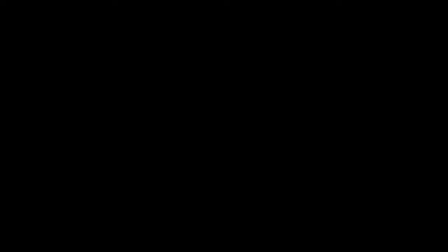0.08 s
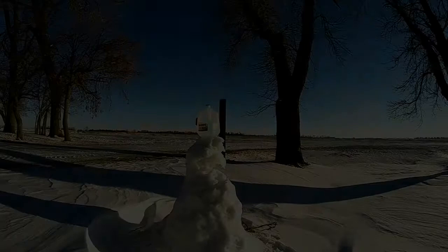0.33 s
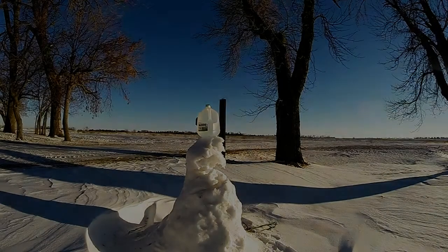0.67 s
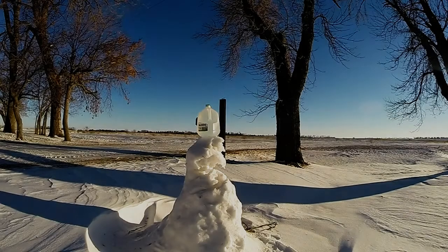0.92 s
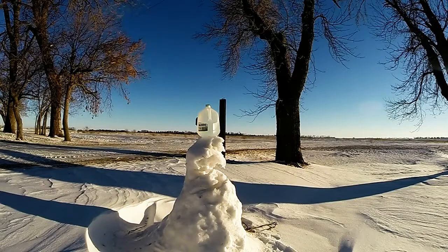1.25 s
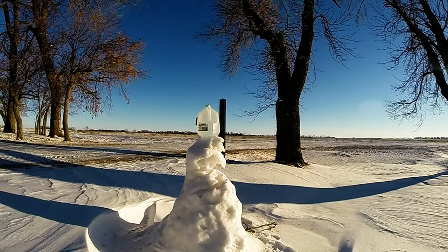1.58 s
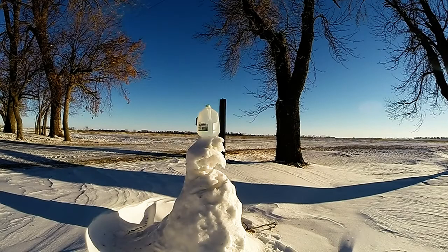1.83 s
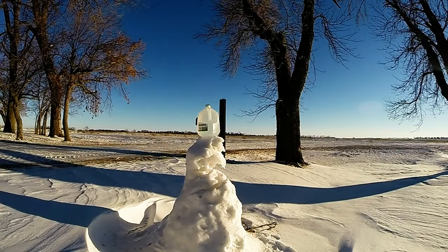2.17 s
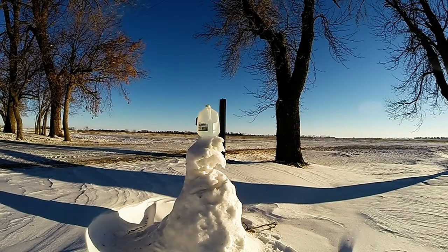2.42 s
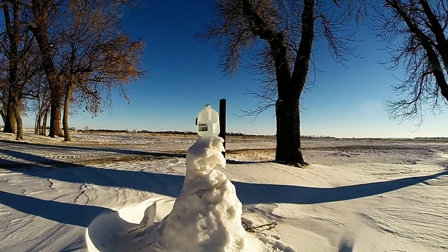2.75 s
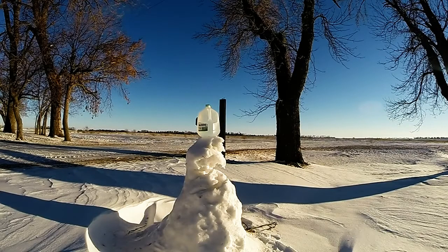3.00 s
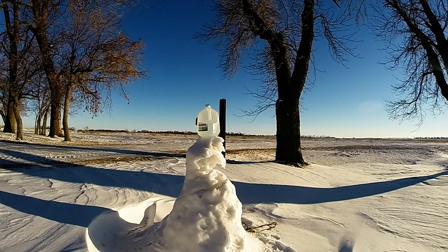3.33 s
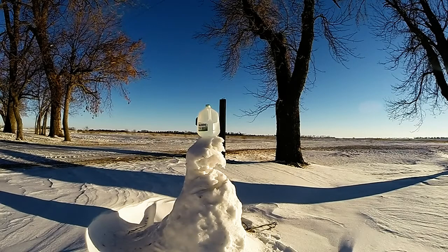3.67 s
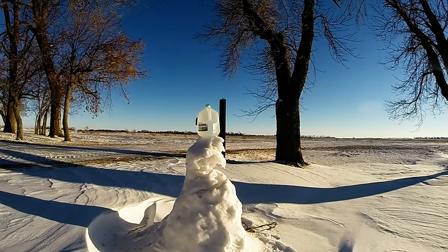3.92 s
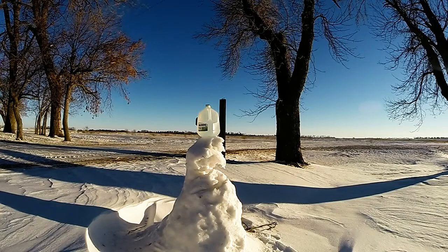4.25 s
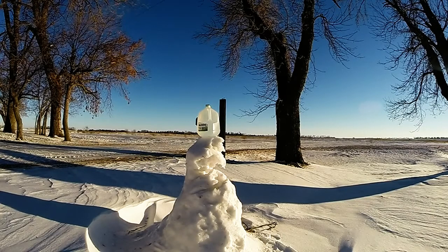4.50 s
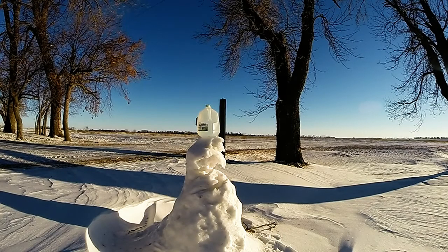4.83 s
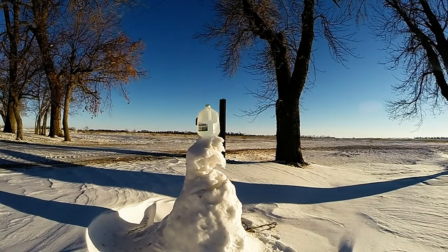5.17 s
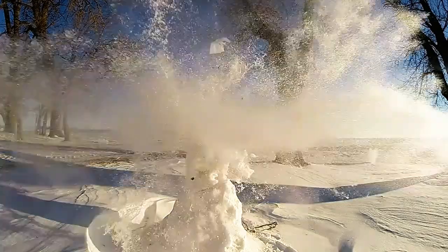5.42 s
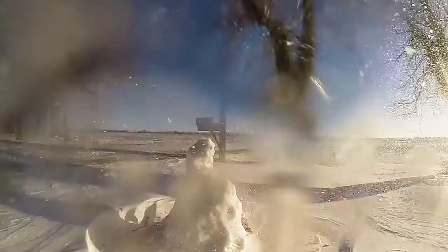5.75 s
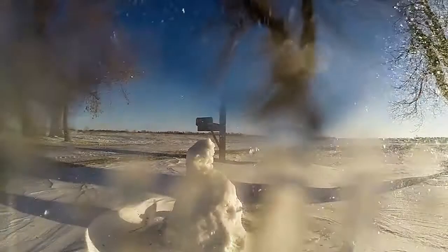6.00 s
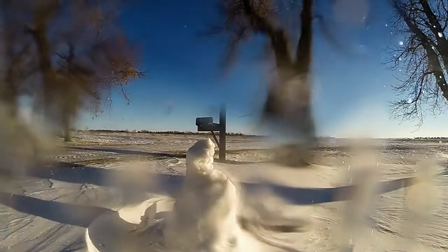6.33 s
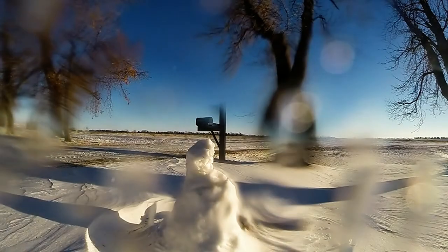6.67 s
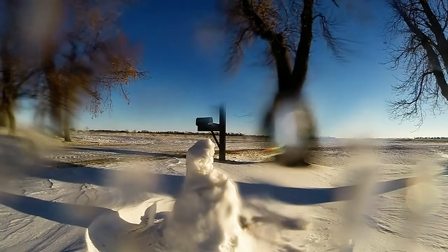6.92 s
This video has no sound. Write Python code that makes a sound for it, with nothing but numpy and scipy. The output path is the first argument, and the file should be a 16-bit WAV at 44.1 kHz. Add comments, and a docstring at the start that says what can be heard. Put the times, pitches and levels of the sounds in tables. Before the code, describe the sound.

Distant rifle clicks over faint wind, then a loud shot bursts a water jug and spray and slush spatter the microphone.

```python
"""Hiss and light wind at a camera in a sealed case, near a water jug in a snowy field.
At 1.1 s a distant rifle is loaded: steel parts click and scrape. At 5.4 s the shot bursts the jug;
the pressure fronts clip the microphone and shake the stand and the case. A sheet of spray hits the
camera, then drops and lumps of slush tap and ring its case for a second. One soft pop at 6.7 s."""
import sys
import numpy as np
from scipy import signal
from scipy.io import wavfile
from scipy.ndimage import uniform_filter1d

SR = 44100
rng = np.random.default_rng(int(sys.argv[2]) if len(sys.argv) > 2 else 0)


def output_pcm(signal):
    """Save a mono or channel-first signal as 16-bit PCM at the path in sys.argv[1].

    Samples are clipped to [-1, 1] before scaling.
    """
    pcm = np.clip(np.atleast_2d(signal).T, -1, 1) * 32767
    wavfile.write(sys.argv[1], SR, np.round(pcm).astype(np.int16))


N = 316638

# hollow case: mode_hz, level_db, t60_s
CASE_MODES = [(817, -8, 0.0256), (927, 3.5, 0.05), (1356, -17, 0.081), (1530, -8, 0.077),
              (1660, -13.5, .04), (1945, -5, 0.059), (1994, -7.5, 0.084), (2810, -6, 0.0301)]
# case rocking on its bracket: mode_hz, level_db, t60_s
BRACKET_MODES = [(170.7, -3, 0.18), (242, -18, 0.033), (309, -6, 0.061), (390, -0.5, 0.029)]
SHEET_S = (5.457, 5.73)  # water thrown straight at the camera: start, release
FALLBACK_S = (5.74, 6.45)  # water thrown upwards, raining back: start, release


def amp(db):
    """Decibels to gain."""
    return 10 ** (np.asarray(db) / 20)


def unit(x):
    """Scale to rms 1."""
    return x / np.sqrt(np.mean(x ** 2) + 1e-20)


def add(mix, start_s, sound):
    """Mix a sound in at start_s."""
    part = mix[round(start_s * SR):][:len(sound)]
    part += sound[:len(part)]


def colour(x, spectrum):
    """Minimum-phase filter from (hz, db) points; clicks keep their sharp start."""
    hz, db = np.transpose(spectrum)
    bin_hz = abs(np.fft.fftfreq(N, 1 / SR))
    log_gain = np.log(amp(np.interp(np.log(bin_hz + 1), np.log(hz + 1), np.maximum(db, -100))))
    response = np.exp(np.conj(signal.hilbert(log_gain)))
    return np.fft.ifft(np.fft.fft(x) * response).real


def fade(t, t60_s):
    """Exponential decay, 60 dB down at t60_s."""
    return np.exp(-np.log(1000) * t / t60_s)


def ring(modes, length_s, rise_s, detune, scatter_db=3):
    """Modes struck by a soft blow; each blow lands elsewhere and weights them anew."""
    t = np.arange(int(length_s * SR)) / SR
    hz, db, t60_s = np.transpose(modes)[:, :, None]
    spot, shift = 2 * rng.random((2, len(modes), 1)) - 1
    weight = amp(db + scatter_db * spot)
    sign = np.cos(np.pi * np.arange(len(modes)))[:, None]  # neighbouring modes in antiphase
    waves = sign * weight * fade(t, t60_s) * np.sin(2 * np.pi * hz * (1 + detune * shift) * t)
    return waves.sum(0) / np.linalg.norm(weight) * (1 - np.exp(-(t / rise_s) ** 2))


def near(modes, centre_hz, loss_db):
    """A blow drives the modes around its own pitch, loss_db weaker an octave away."""
    return [(hz, db - loss_db * np.log2(hz / centre_hz) ** 2, t60_s) for hz, db, t60_s in modes]


def burst(low_hz, high_hz, t60_s):
    """Decaying band noise, starting near rms 1."""
    t = np.arange(SR // 8) / SR
    band = signal.butter(3, [low_hz, high_hz], "band", fs=SR, output="sos")
    noise = rng.standard_normal(len(t))
    return signal.sosfilt(band, noise * fade(t, t60_s)) / np.std(signal.sosfilt(band, noise))


def crumble(sound, crumbs_db, mean_delay_s, count=8):
    """One contact, then weaker ones of random sign and delay."""
    hits = np.zeros(SR // 20)
    delays = np.minimum(rng.exponential(1, count) * mean_delay_s * SR, len(hits) - 1).astype(int)
    hits[delays] = amp(crumbs_db) * rng.choice([-1, 1], count) / np.sqrt(count)
    hits[0] = 1
    return signal.fftconvolve(sound, hits / np.linalg.norm(hits))


def hiss():
    """Steady background hiss."""
    # freq_hz, density_db
    spectrum = [(90, -19), (150, -2.5), (240, -5.5), (460, -10), (950, -14), (2000, -17.5), (3500, -21),
                (6400, -26), (7400, -23), (8600, -31.5), (11300, -32), (12100, -34), (13200, -37),
                (14900, -36.5), (15600, -72)]
    return amp(-50) * unit(colour(rng.standard_normal(N), spectrum))


def wind():
    """Light gusts buffet the case: a low rumble."""
    # freq_hz, density_db
    spectrum = [(4.7, -19.5), (8.0, 2.5), (21, -1.5), (35, -0.5), (52, -7.5), (92, -16), (200, -32),
                (260, -56), (440, -120)]
    # wind strength before and after the shot: time_s, relative_db
    early_gusts = [(0.08, -38), (0.6, -39.5), (0.66, -43), (1.55, -47.5), (1.64, -42.5), (2.62, -45),
                   (2.75, -37.5), (3.34, -45), (3.67, -39.5), (4.57, -44.5), (4.86, -37.5), (5.3, -45)]
    late_gusts = [(5.55, -47), (5.772, -33.5), (6.226, -50), (6.338, -36.5), (7.15, -45)]
    gust_db = np.interp(np.arange(N) / SR, *np.transpose(early_gusts + late_gusts))
    return amp(gust_db + 5.5) * unit(colour(rng.standard_normal(N), spectrum))


def rifle_action():
    """Distant steel parts scrape and click home, each at its own pitch."""
    # contacts: start_s, level_db, centre_hz
    contacts = [(1.1122, -36, 2700), (1.133, -38.5, 2100), (1.2712, -36, 2800), (1.276, -34.5, 2600),
                (1.509, -36, 2110), (1.569, -35, 2200), (1.5802, -32.5, 2300), (1.6105, -27, 2660)]
    # steel action: mode_hz, level_db, t60_s
    steel_modes = [(1640, -8, 0.042), (2014, 2, 0.04), (2440, -5, 0.028), (2700, -7, 0.031),
                   (3170, -0.5, 0.026), (3900, -4, .025), (4440, -6, 0.03)]
    out = np.zeros(N)
    for start_s, level_db, centre_hz in contacts:
        click = ring(near(steel_modes, centre_hz, loss_db=9), length_s=.1, rise_s=0.0012, detune=0.023)
        add(out, start_s, amp(level_db) * crumble(click, crumbs_db=-5, mean_delay_s=0.003))
        scrape = amp(-12.5) * burst(1200, 8100, t60_s=0.03)
        add(out, start_s, amp(level_db) * scrape)
    return out


def crack(centre_hz, t60_s, fall=0.54, fall_s=0.00243, roughness=0.21):
    """A rough ring whose pitch drops at once, with a puff of treble."""
    t = np.arange(SR // 8) / SR
    wobble = unit(uniform_filter1d(rng.standard_normal(len(t)), 16))
    pitch_hz = centre_hz * (1 + fall * (np.exp(-t / fall_s) - .5)) * (1 + roughness * wobble)
    tone = np.sin(2 * np.pi * np.cumsum(pitch_hz) / SR) * fade(t, t60_s)
    return tone + amp(-7.5) * burst(3560, 7300, t60_s * 0.67)


def shot(rise_s=0.00043, echo_delay_s=0.004):
    """Each front is a push, a longer suction and a crack; the blast shakes stand and case, and echoes."""
    # pressure fronts of bullet, bursting jug, muzzle:
    # start_s, push_db, push_s, crack_db, crack_hz, crack_t60_s
    fronts = [(5.4224, 11, 0.00068, 8.5, 2596, 0.018), (5.425, 22.5, 0.0015, 6.5, 1600, 0.02),
              (5.429, 23, 0.00087, 6, 1773, 0.026)]
    # camera stand: mode_hz, level_db, t60_s
    stand_modes = [(60.3, -4.5, 0.033), (63.5, -31, 6.1), (267, 2, 0.03), (411, 1.5, 0.031),
                   (849, -3.5, 0.064)]
    out, t = np.zeros(N), np.arange(SR // 8) / SR
    for start_s, push_db, push_s, crack_db, crack_hz, crack_t60_s in fronts:
        push = (1 - t / push_s) * np.exp(-t / push_s) * (1 - np.exp(-t / rise_s))
        add(out, start_s, amp(crack_db) * crack(crack_hz, crack_t60_s) - amp(push_db) * push)
    muzzle_s = fronts[-1][0]
    add(out, muzzle_s, amp(9) * ring(stand_modes, length_s=2, rise_s=0.0068, detune=0))
    add(out, muzzle_s, amp(-4) * ring(CASE_MODES, length_s=.2, rise_s=0.000522, detune=0))
    echo = amp(-18.5) * burst(220, 2800, t60_s=0.072)  # off snow and trees
    add(out, muzzle_s + echo_delay_s, echo)
    return out


def shower(span_s, db, slope_db_per_s, release_db_per_s, attack_s):
    """Gain of a shower: sets in, grows or sags evenly over its span, dies away."""
    t, (start_s, end_s) = np.arange(N) / SR, span_s
    held_db = db + slope_db_per_s * (np.clip(t, start_s, end_s) - start_s)
    release_db = release_db_per_s * np.maximum(t - end_s, 0)
    return np.clip((t - start_s) / attack_s, 0, 1) * amp(held_db - release_db)


def impacts(rate_per_s, spread_db):
    """Random impulses of uneven size; mean power near 1 at any rate."""
    size_db = spread_db * np.minimum(rng.exponential(1, N), 3)
    size = unit(amp(size_db) * rng.choice([-1, 1], N))
    return size * (rng.random(N) < rate_per_s / SR) * np.sqrt(SR / rate_per_s)


def spray(thinning_s=0.2):
    """Fine spray arrives as a sheet, in clumps of a few ms, thins to single droplets and rains back."""
    # spray heard through the case: freq_hz, density_db
    spectrum = [(50, -23), (100, -3), (150, -8), (330, -7), (600, -13), (900, -14), (1070, -13.5),
                (1400, -13.5), (2050, -8), (2700, -22), (3500, -22.5), (6600, -24.5), (8500, -40.5),
                (12500, -40.5), (15500, -69)]
    age_s = np.maximum(np.arange(N) / SR - SHEET_S[0], 0)
    rate_per_s = 450 + 3500 * np.exp(-age_s / thinning_s)
    sheet = shower(SHEET_S, db=-23, slope_db_per_s=-6, release_db_per_s=602, attack_s=0.0039)
    fallback = shower(FALLBACK_S, db=-42, slope_db_per_s=2, release_db_per_s=52, attack_s=0.029)
    clump_db = 3.5 * unit(uniform_filter1d(rng.standard_normal(N), 160))
    droplets = impacts(rate_per_s, spread_db=5) * unit(amp(clump_db)) * (sheet + fallback)
    return colour(droplets, spectrum) / np.linalg.norm(colour(signal.unit_impulse(N), spectrum))


def slap(pitch_hz):
    """Water slaps the thin front plate with a short ring at the given pitch; peak 1."""
    # front plate: pitch_ratio, level_db, t60_s
    plate_modes = [(0.918, -1.5, 0.01), (1.199, -11.5, 0.018), (1.7, -17, 0.011)]
    modes = [(ratio * pitch_hz, db, t60_s) for ratio, db, t60_s in plate_modes]
    sound = ring(modes, length_s=.04, rise_s=0.00036, detune=0.1)
    return sound / abs(sound).max()


def patter(spots=8):
    """Slush grains tap spots on the case, each with its own ring; being slower, they trail the spray."""
    sheet = shower(SHEET_S, db=-31, slope_db_per_s=45.5, release_db_per_s=452, attack_s=0.004)
    fallback = shower(FALLBACK_S, db=-32, slope_db_per_s=-2, release_db_per_s=120, attack_s=0.074)
    case = near(CASE_MODES, centre_hz=1800, loss_db=2)
    out = np.zeros(N)
    for _ in range(spots):
        tap = amp(-21) * ring(BRACKET_MODES, length_s=.3, rise_s=0.0024, detune=0.014)
        add(tap, 0, amp(-6.5) * ring(case, length_s=.1, rise_s=0.0011, detune=0.02))
        add(tap, 0, slap(pitch_hz=rng.uniform(1376, 2100)))
        grains = impacts(rate_per_s=80, spread_db=6) * (sheet + fallback)
        out += signal.oaconvolve(grains, tap / np.linalg.norm(tap))[:N]
    return out / np.sqrt(spots)


def lumps():
    """Crumbling slush knocks the wet case, slaps its front and rocks it on its bracket."""
    # lumps on the camera: start_s, knock_db, rock_db
    hits = [(5.557, -36, -24), (5.617, -8, -18), (5.665, -12, -30), (5.683, -1.5, -22), (5.692, -2.5, -9),
            (5.71, -9, -16), (5.722, -2, -36), (5.729, -4.5, -7.5), (5.773, -23, -31), (5.7923, -13.5, -32),
            (6.037, -15, -34), (6.0612, -13.5, -26.5), (6.133, -29, -24), (6.2643, -13, -24),
            (6.2785, -1, -13), (6.3173, -17.5, -33), (6.4085, -17, -21), (6.449, -12.5, -30),
            (6.6528, -11, -30.5)]
    # clinging water lowers the case's ring until it runs off: time_s, pitch_ratio
    wet_pitch = [(5.45, 0.99), (5.73, 0.92), (6.05, 0.942), (6.27, 0.99), (6.65, 1.01)]
    out = np.zeros(N)
    for start_s, knock_db, rock_db in hits:
        pitch_ratio = np.interp(start_s, *np.transpose(wet_pitch))
        wet_case = [(hz * pitch_ratio, db, t60_s) for hz, db, t60_s in CASE_MODES]
        case = near(wet_case, centre_hz=1120, loss_db=2.5 - 0.3 * knock_db)  # lighter lumps: duller
        knock = ring(case, length_s=.15, rise_s=0.0018, detune=0.014)
        add(knock, 0, amp(-3.5) * slap(pitch_hz=1700))
        add(out, start_s, amp(knock_db) * crumble(knock, crumbs_db=-5.5, mean_delay_s=0.004))
        drive_hz = max(370 + 4.5 * rock_db, 100)  # lighter lumps push more slowly
        bracket = near(BRACKET_MODES, drive_hz, loss_db=6)
        add(out, start_s, amp(rock_db) * ring(bracket, length_s=.3, rise_s=0.0019, detune=0.016))
    return out


def drops():
    """Each drop ticks on the front plate, slaps it and splashes."""
    # drops on the camera: start_s, slap_db, pitch_hz, splash_db
    hits = [(5.572, -10, 1680, -17), (5.623, 0, 1946, -16.5), (5.6336, -6, 1760, -27),
            (5.6545, -15, 1900, -11.5), (5.691, 0, 1850, -24), (5.7012, 4.5, 1740, -33),
            (5.71, 5, 1724, -34), (5.729, 10.5, 1620, -25), (5.7926, -15, 1840, -23),
            (5.804, -12.5, 1520, -33), (5.8729, -14, 1640, -30.5), (5.899, -2, 1554, -25),
            (5.9119, -8, 1880, -37), (5.9234, -7, 1480, -24), (5.9761, -6.5, 1510, -30.5),
            (5.982, -7, 1690, -29), (6.009, -18, 1960, -37), (6.2788, -4.5, 1755, -25.5),
            (6.3319, -4, 1640, -25), (6.363, -7, 2220, -19), (6.449, -7, 1640, -30.5),
            (6.4556, -8.5, 1770, -39), (6.489, -9, 1810, -35), (6.5679, -20.5, 1960, -33.5),
            (6.5928, -25, 1640, -41), (6.6227, -12.5, 1623, -34)]
    out = np.zeros(N)
    for start_s, slap_db, pitch_hz, splash_db in hits:
        add(out, start_s, amp(slap_db) * crumble(slap(pitch_hz), crumbs_db=-13, mean_delay_s=0.002))
        splash = burst(2000, 6150, t60_s=0.014)
        tick = amp(-14.5) * burst(7400, 12500, t60_s=0.0047)
        add(out, start_s, amp(splash_db) * (splash + tick))
    return out


def pop(start_s=6.7468, level_db=-24):
    """A small pressure step that leaks away."""
    out = np.zeros(N)
    add(out, start_s, -amp(level_db) * fade(np.arange(SR // 10) / SR, t60_s=0.026))
    return out


def scene(start_s=0.073):
    """All sources at one microphone; silent before start_s."""
    sound = hiss() + wind() + rifle_action() + shot() + drops() + lumps() + spray() + patter() + pop()
    return (sound * (np.arange(N) / SR > start_s))[None]


def record(dry):
    """The microphone clips hard at full scale; then a low-pass."""
    cutoff_hz = 16200
    lowpass = signal.firwin(255, cutoff_hz, window=("kaiser", 8), fs=SR)
    return signal.oaconvolve(np.clip(dry, -1, 1), lowpass[None], "same")


dry = scene()
out = record(dry)
output_pcm(out)
```